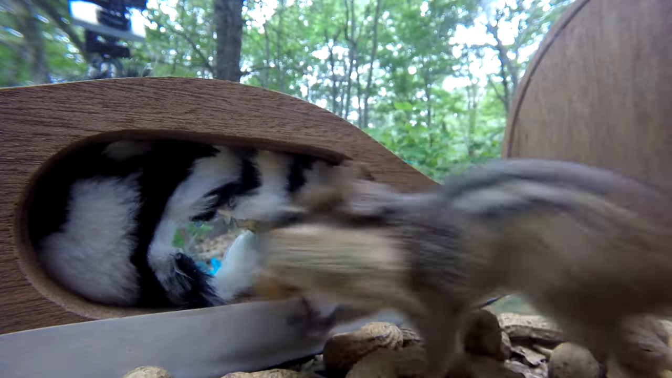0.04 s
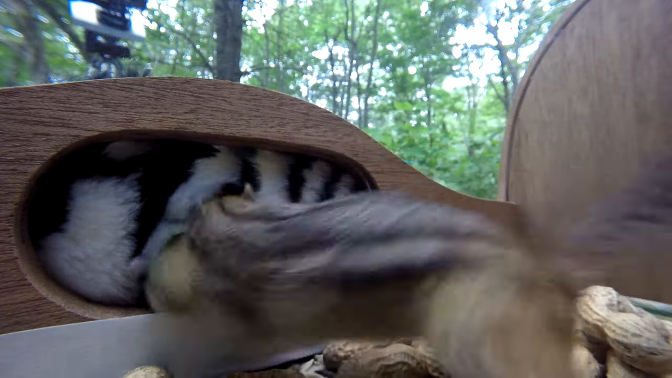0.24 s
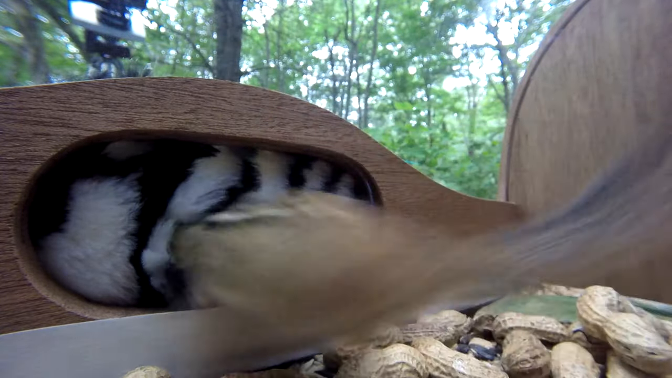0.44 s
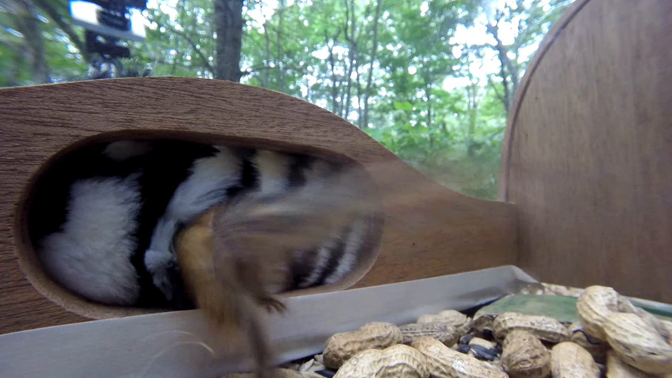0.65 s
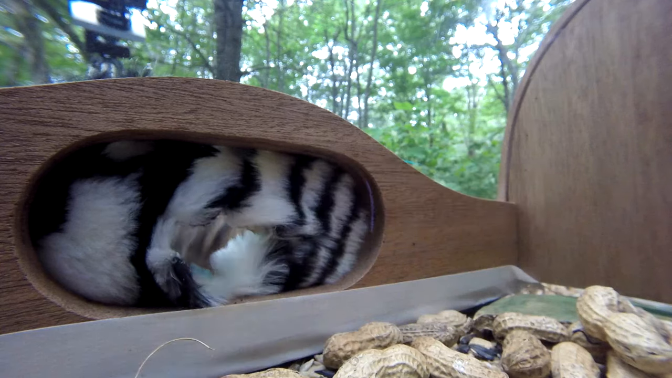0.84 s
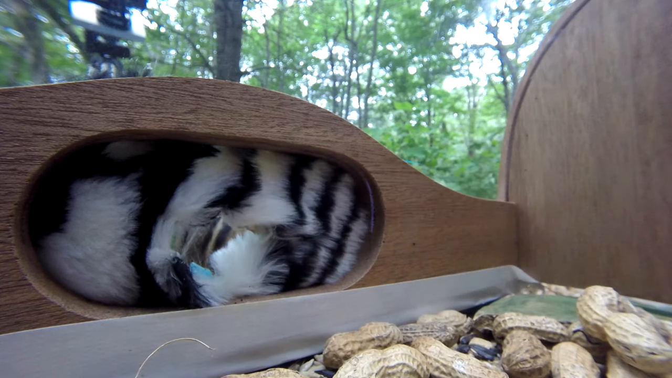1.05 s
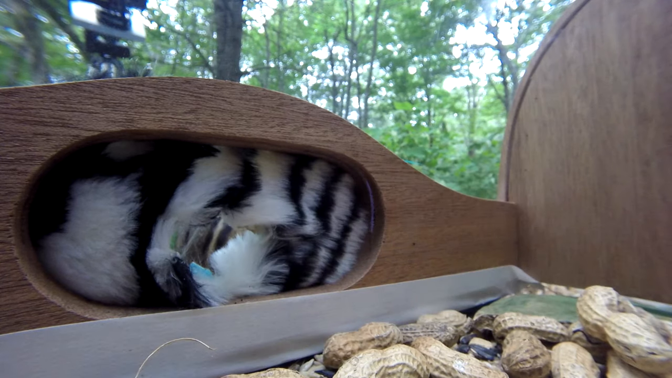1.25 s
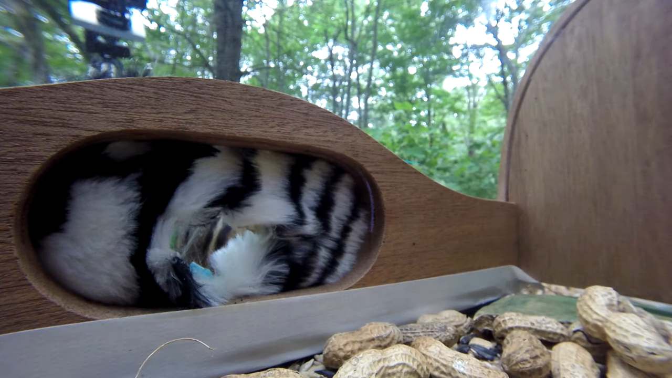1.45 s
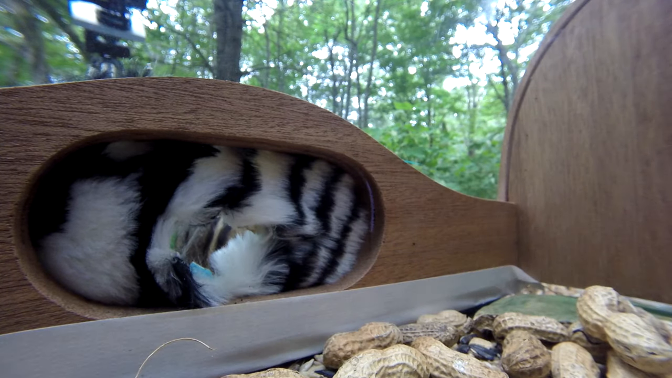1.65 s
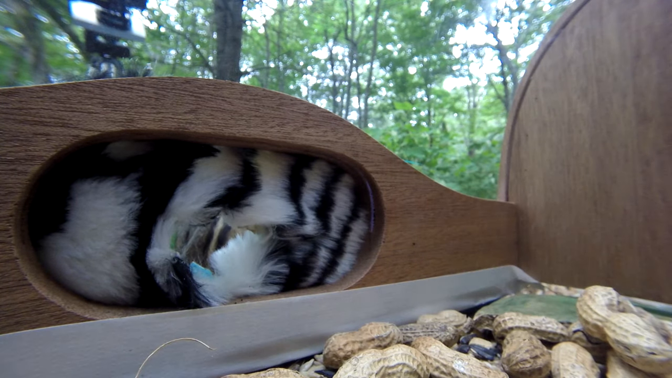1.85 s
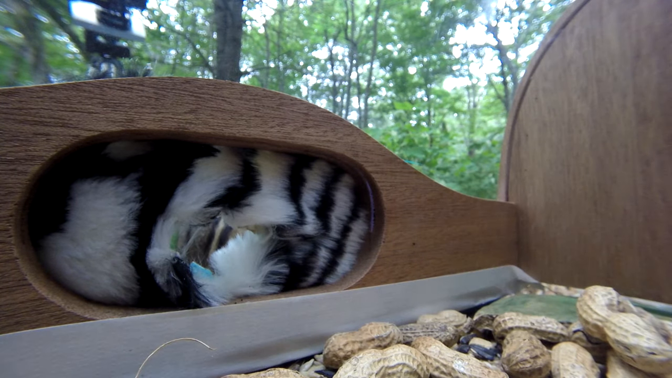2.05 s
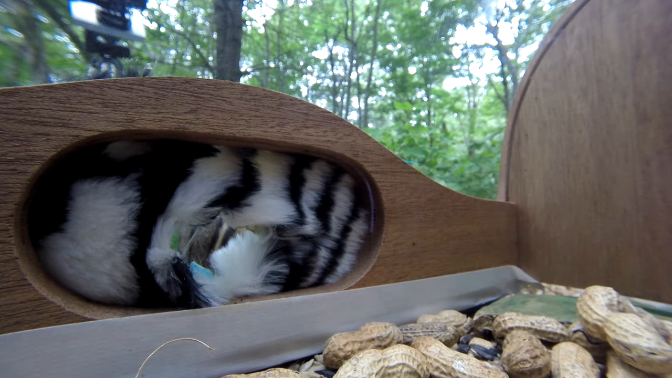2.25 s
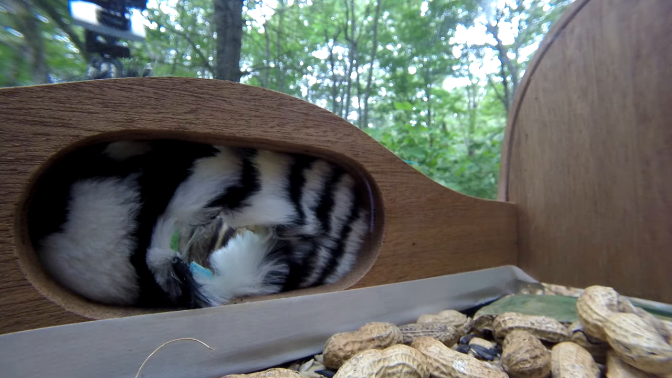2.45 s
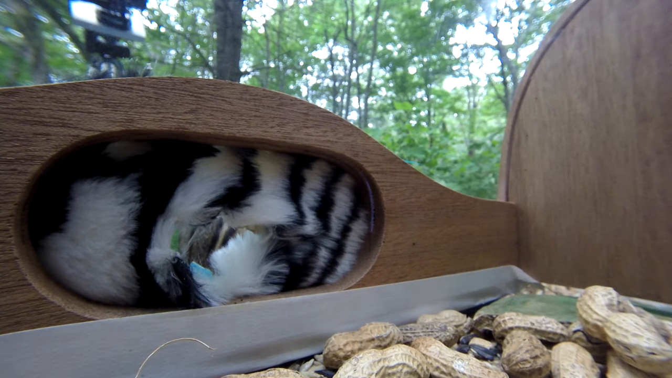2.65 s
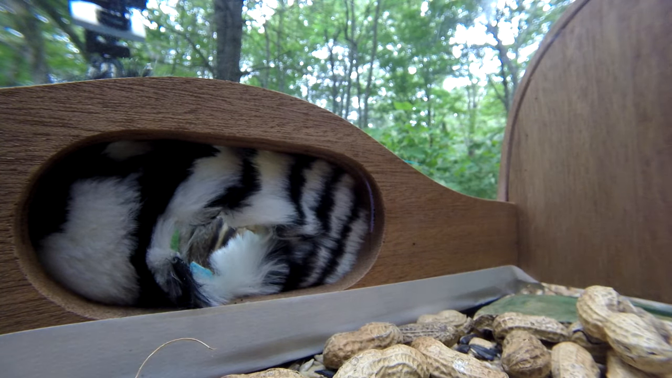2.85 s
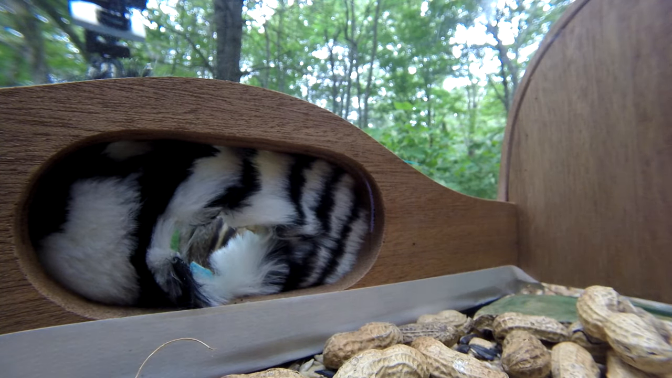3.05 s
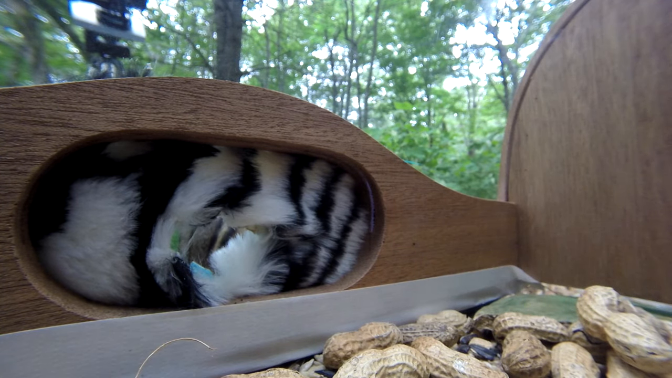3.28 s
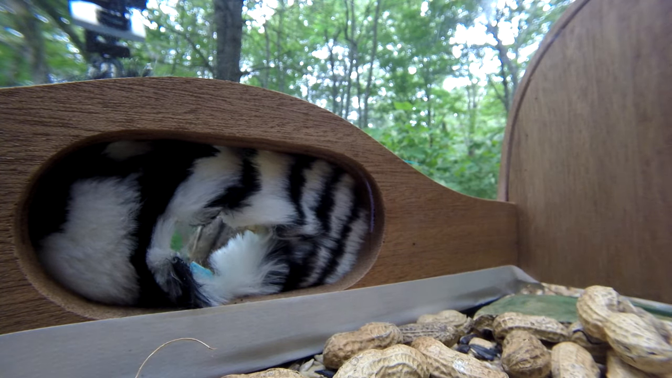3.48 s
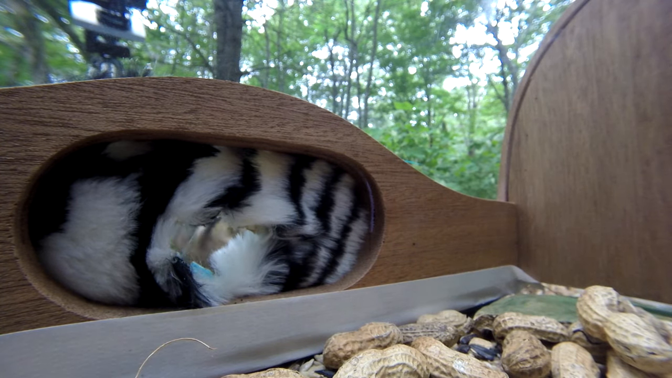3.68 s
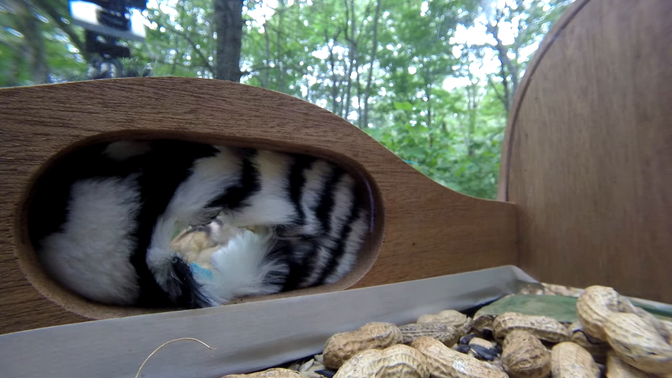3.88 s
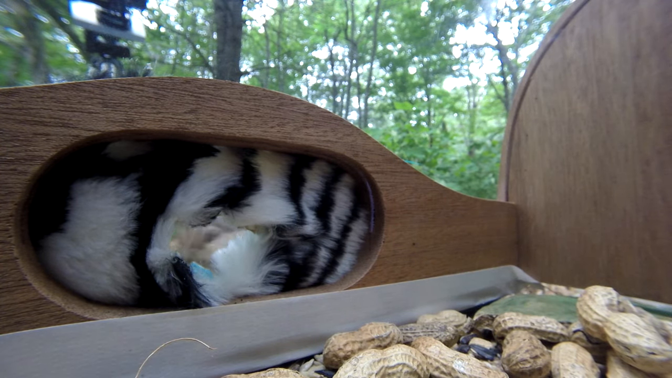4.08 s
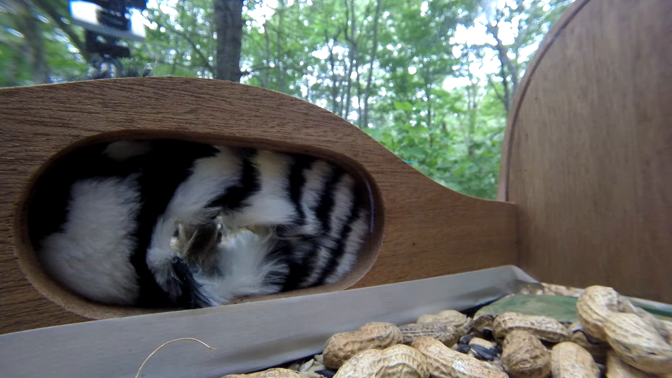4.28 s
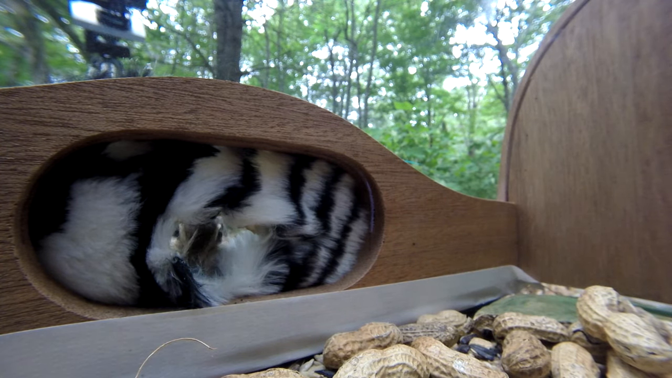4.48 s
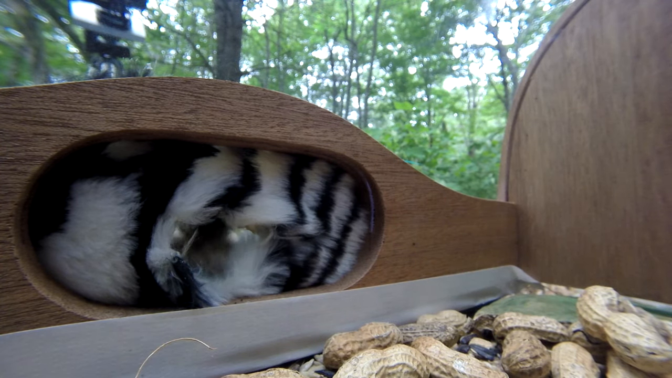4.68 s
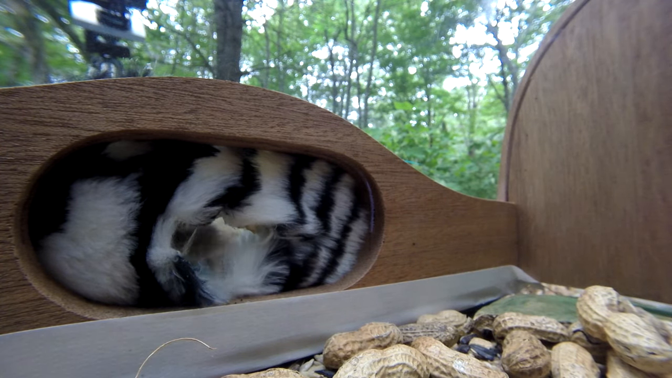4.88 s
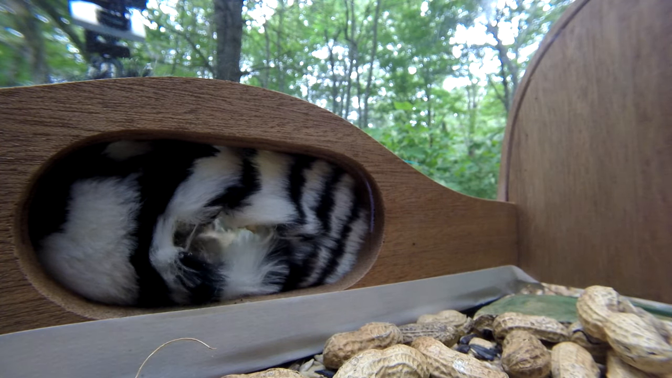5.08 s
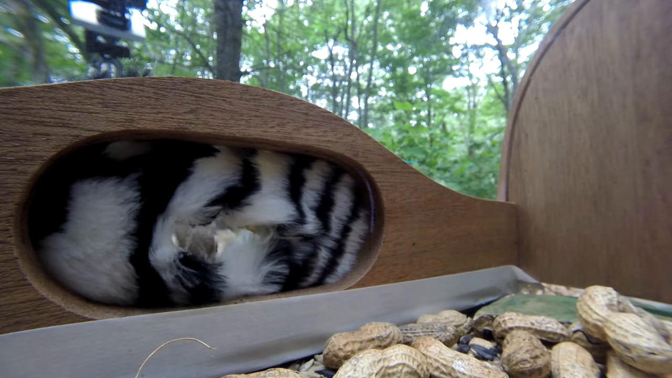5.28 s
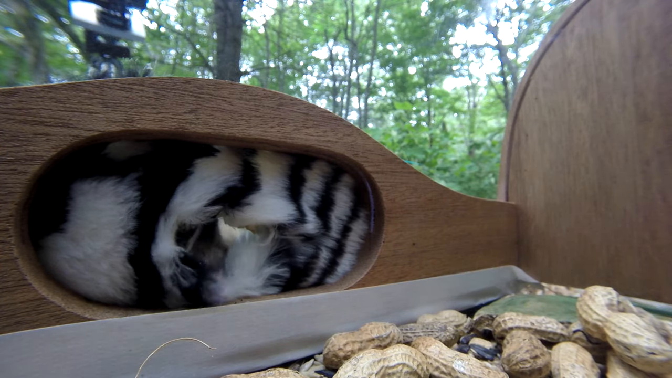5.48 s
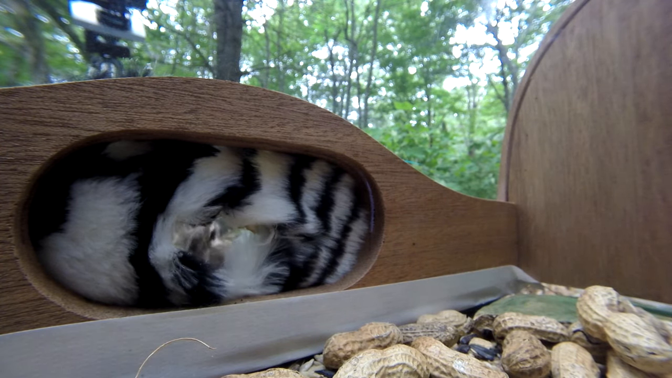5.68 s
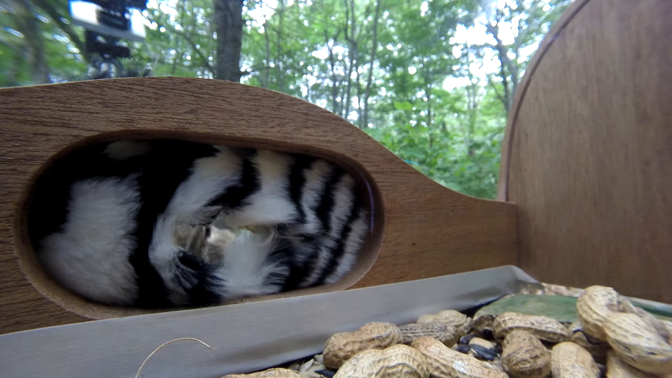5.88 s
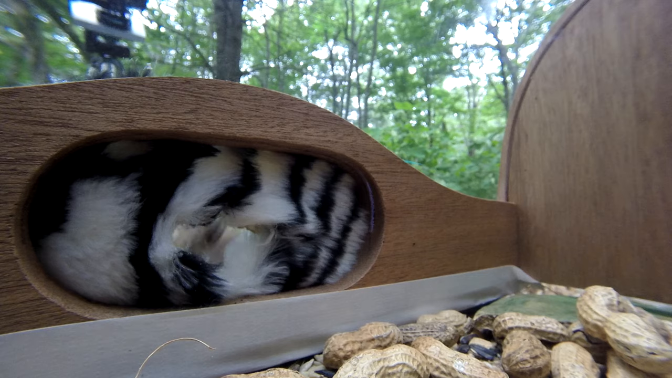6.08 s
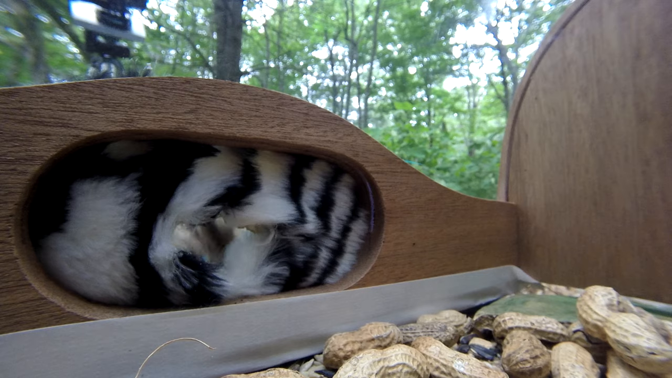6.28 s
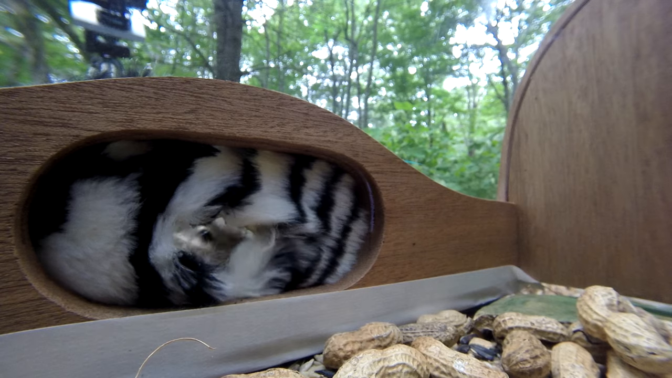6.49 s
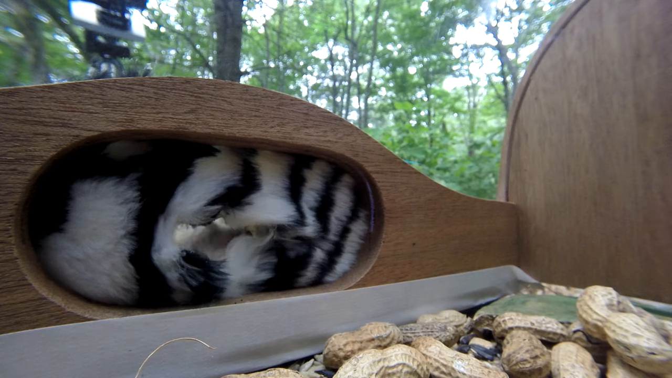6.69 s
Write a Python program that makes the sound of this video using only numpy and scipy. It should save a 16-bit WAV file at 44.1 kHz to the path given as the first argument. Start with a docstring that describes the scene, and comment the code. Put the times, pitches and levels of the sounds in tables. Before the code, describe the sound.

A quiet wood gives a faint, steady bed of leaves and soft hiss throughout, heard in mono from close beside a wooden feeder box. At 0.1 to 0.9 s a chipmunk scrambles over peanuts: hollow shells clack and rattle, sharpest near 0.4, claws scrape dryly, paws thud, with a deep bump at 0.85. A small tick follows near 1.15, then near stillness with barely audible ticks around 1.6, 1.8 and 2.4. Thin distant birds whistle at 3.1 and 3.4, quickly sliding upward, and once higher and level at 4.35. Digging starts at 3.7 with soft low thumps, again at 4.1, then at 4.7 to 5.0 with shell knocks and rustling fur and husks. From 5.1 to the end it is busiest: scratches at 5.3, strong woody knocks at 5.55, 5.9 and 6.0, boomy thumps at 6.1 and 6.6, still rummaging as it ends.

```python
"""A wooden feeder box heard from close by, in a quiet wood with faint leaves and hiss throughout.
First a chipmunk scrambles over peanuts: paws thump the boards, shells knock and rattle, claws scrape.
From about 1.2 s it has left, and only a few faint ticks remain; soon after 3 s far birds whistle.
From about 3.7 s it digs from inside a furry sleeve, with fur and husks rustling, busiest at the end.
Pushes and tiny impacts ring modes of boards and shells; shaped noise and sines make wood and birds."""
import sys
import numpy as np
from scipy import signal
from scipy.fft import rfft, irfft
from scipy.io import wavfile

SR = 44100
rng = np.random.default_rng(int(sys.argv[2]) if len(sys.argv) > 2 else 0)


def volts(x):
    """Linear amplitude factor 10**(x/20) for a level x in dB, scalar or array-like."""
    e = np.asarray(x, float) / 20
    return 10 ** e


def generate_wav(sig):
    """Save sig (samples, or channels by samples) to the path in sys.argv[1] as 16-bit PCM at SR."""
    pcm = np.round(np.clip(np.atleast_2d(sig).T, -1, 1) * 32767).astype(np.int16)
    wavfile.write(sys.argv[1], SR, pcm)


N = 296793

# far leaves and hiss, spectrum: (f/Hz, level per Hz/dB)
WOOD_SPECTRUM = [(15, -25), (25, -1), (60, 1), (120, -1.5), (200, -5), (400, -11), (1000, -17),
                 (2000, -22.5), (4000, -29), (6300, -35), (9000, -40.5), (13000, -46.5), (15500, -49)]
# far whistles: (start t/s, length t/s, first f/Hz, f/Hz where the slide levels off, level/dB)
BIRD_WHISTLES = [(3.09, .2, 3130, 3300, -68), (3.41, .15, 2500, 2650, -66), (3.41, .33, 2540, 2830, -62),
                 (4.35, .14, 4275, 4270, -65.5)]
# one curve for each bout of shuffling: (t/s, weight on the boards level/dB, rustle of husks level/dB)
SHUFFLE_BOUTS = [
    [(0, -41, -44), (0.12, -46, -58), (0.22, -24, -25), (0.4, -31, -31.5), (0.49, -32, -46.5),
     (0.55, -30, -34.5), (0.78, -28.5, -38), (0.83, -39, -56), (0.9, -21, -44), (1.0, -89, -87)],
    [(3.68, -69, -61), (3.73, -29.5, -74), (3.82, -30, -71), (3.9, -57, -61), (3.95, -68, -61)],
    [(4.05, -50, -66), (4.16, -24, -45.5), (4.25, -61, -89)],
    [(4.67, -49, -62), (4.71, -30, -39), (4.87, -35.5, -47), (5.0, -24, -24), (5.05, -36, -56),
     (5.1, -47, -71)],
    [(5.08, -51, -50), (5.16, -35.5, -57), (5.25, -27.5, -30.5), (5.35, -34, -55), (5.44, -30, -33.5),
     (5.52, -24, -34), (5.6, -37, -35.5), (5.66, -34, -38), (5.76, -43, -59)],
    [(5.76, -47, -57), (5.84, -42.5, -42.5), (5.92, -30, -40), (5.97, -29, -56), (6.16, -27.5, -60),
     (6.26, -42.5, -78)],
    [(6.26, -64, -77), (6.3, -31, -49), (6.4, -28.5, -35), (6.49, -32, -41), (6.63, -31.5, -32),
     (6.73, -28, -33)],
]
# low modes of the boards and air of the box: (f/Hz, level/dB, t60/s)
BOX_LOW_MODES = [(39, -3.5, 0.053), (71.4, -6.5, 0.25), (98, -0.5, 0.058), (135, 1, 0.15),
                 (192.9, 3, 0.098), (241.4, 3, 0.055), (340.8, -1, 0.095), (514, -0.5, 0.091)]
# high modes of the box: (f/Hz, level/dB, t60/s)
BOX_HIGH_MODES = [(484.6, -12.5, 0.039), (577, -31.5, 0.12), (817, -9.5, 0.049), (923, -5, 0.02),
                  (1045.6, -5.5, 0.036), (1129, -6, 0.012), (1390, -4, 0.0043), (1621, -22, 0.066),
                  (1970, -14.5, 0.025), (2299, -15.5, 0.025), (2547, -19.5, 0.038), (3160, -31.5, 0.052),
                  (4560, -13.5, 0.0098)]
# dry scratch, spectrum: (f/Hz, level per Hz/dB)
SCRATCH_SPECTRUM = [(1200, -11), (2200, 5.5), (3200, -7), (4500, -4), (6500, -9), (9000, -15.5),
                    (12000, -18.5), (15500, -32)]
# hollow shells knock on wood:
# (t/s, shell peak level/dB, board ring level/dB, scratch level/dB, shell pitch f/Hz)
SHELL_KNOCKS = [(0.138, -30, -35, -34, 2020), (0.2412, -12.5, -31, -29, 1810), (0.259, -27, -36, -30, 1590),
                (0.3072, -15.5, -33, -33, 1650), (0.3556, -27, -33, -34.5, 2460),
                (0.396, 1, -27, -29.5, 1570), (0.5026, -25.5, -47, -49, 2240),
                (0.5217, -35, -28.5, -48, 1330), (0.576, -21.5, -33, -61, 1740),
                (0.6283, -23, -37, -36.5, 1940), (0.702, -28, -47, -54, 2400),
                (1.1455, -39, -48.5, -80, 1730), (2.3976, -43.5, -70, -80, 1900),
                (3.7076, -33.5, -43.5, -51.5, 2530), (4.1332, -34, -31, -47, 1730),
                (4.7276, -30, -40, -52, 1750), (4.7874, -27.5, -30, -43, 1590),
                (4.932, -18.5, -37, -48, 1330), (4.9635, -11, -25, -39.5, 1800),
                (4.9857, -16, -24, -47, 2170), (5.107, -33, -38, -49, 1330),
                (5.1438, -32, -34, -46.5, 2210), (5.1782, -34, -32, -46, 1310),
                (5.195, -17.5, -23, -41.5, 2110), (5.216, -21.5, -66, -43, 2470),
                (5.2739, -14, -48, -55, 1310), (5.2969, -18, -22.5, -56, 1600),
                (5.3571, -18, -28.5, -42.5, 1650), (5.454, -22, -20.5, -38, 2010),
                (5.5512, -7, -11.5, -26, 2260), (5.5931, -30, -23.5, -44.5, 2010),
                (5.696, -29, -31, -47.5, 1970), (5.877, -5, -19, -28.5, 1204),
                (5.9676, -13.5, -21.5, -38, 2100), (6.0094, -25, -25, -46, 1810),
                (6.0236, -4.5, -15.5, -37, 1870), (6.0896, -28.5, -42, -54, 2210),
                (6.313, -36, -34, -62, 1280), (6.3631, -25, -32, -45.5, 2240),
                (6.4437, -13, -19.5, -30.5, 1880), (6.5197, -39, -30, -44, 2160),
                (6.6044, -19, -20, -39, 2240)]
# claws tick and scrape on wood: (t/s, board ring level/dB, scratch level/dB, contact length t/s)
CLAW_SCRAPES = [(0.1222, -48, -36.5, 0.025), (0.1924, -49, -32.5, 0.045), (0.3225, -31, -31, 0.03),
                (0.761, -33, -62, 0.01), (0.8522, -30.5, -45.5, 0.019), (1.576, -53.5, -62, 0.013),
                (1.827, -57, -58, 0.0045), (3.744, -46, -57, 0.019), (3.78, -40, -47.5, 0.0086),
                (3.7918, -33.5, -63, 0.012), (3.896, -53, -65, 0.0098), (4.2116, -45, -53.5, 0.0095),
                (4.8115, -30, -47.5, 0.0087), (4.904, -36, -45.5, 0.033), (5.254, -25.5, -39, 0.018),
                (5.3214, -27.5, -24.5, 0.024), (5.373, -27, -20, 0.023), (5.4175, -28, -55, 0.025),
                (5.481, -42, -39.5, 0.02), (5.499, -24, -41, 0.013), (5.865, -38, -70, 0.044),
                (5.9125, -40, -51, 0.01), (6.1053, -15, -39.5, 0.012), (6.1173, -24.5, -43, 0.015),
                (6.2076, -34.5, -51.5, 0.016), (6.287, -37, -53.5, 0.012), (6.418, -30.5, -43, 0.039),
                (6.5828, -17.5, -34, 0.012), (6.6776, -17.5, -41.5, 0.0086), (6.7204, -23.5, -38, 0.016)]
# paws on the boards: (t/s, peak level/dB, pitch that the push favours f/Hz)
PAW_THUMPS = [(0.203, -19, 177), (0.251, -17, 153), (0.319, -10.5, 180), (0.345, -17.5, 121),
              (0.513, -26.5, 101), (0.59, -22.5, 177), (0.675, -22, 64), (0.853, -3, 84), (3.716, -27, 148),
              (3.754, -19, 58.7), (3.788, -21, 86), (4.092, -20.5, 152), (4.129, -12, 90),
              (4.711, -22.2, 184), (4.782, -10, 142), (4.815, -11, 117), (4.929, -15, 181),
              (4.973, -21, 152), (5.188, -13.5, 211), (5.426, -20, 145), (5.452, -12, 190),
              (5.495, -11, 192), (5.547, 1.5, 152), (5.592, -14.5, 135), (5.69, -10, 229),
              (5.872, -6.5, 176), (6.006, -12, 58.5), (6.018, -1.5, 142.5), (6.106, -0.5, 166),
              (6.357, -17, 88.8), (6.435, -16, 200), (6.577, -1, 187), (6.675, -4.5, 193)]

WOOD_DB = -46.5
FUR_DB, FUR_FOLLOWS = -50, 0.46  # level at a rustle of -40 dB; share of the rustle's swing in dB
LEAVES_NUTS_S = 1.2
HUSKS_AMONG_NUTS_DB = -6  # lying on the heap, husks touch the boards less
RATTLE_PER_S, RATTLE_HZ, RATTLE_T60_S = 1100, (453, 3200), 0.01
RATTLE_DB = (-2, -10)  # relative to the rustle: among the nuts, from the sleeve
# contact time of a knock; it grows (dB per dB) as the shell softens and as scratch gains on shell
KNOCK_S, LONGER_IF_SOFT, LONGER_IF_SCRATCHY, LONGEST_KNOCK_S = 0.011, 0.14, 0.22, 0.02
FADE_SHAPE = {"knock": 0.93, "scrape": 1.93}  # exponent: a scrape holds, then stops
BUILD_SHARE = {"knock": 0.25, "scrape": 0.33}  # friction builds over this share of the contact
SHELL_OVERTONE, SHELL_OVERTONE_DB = 1.678, -8.5  # second mode of a shell: ratio, level


def rms_one(x):
    """Scales a sound to rms 1."""
    return x / np.sqrt(np.mean(x ** 2) + 1e-20)


def in_time(rows, quiet):
    """Draws each column as a curve over time, quiet outside its rows."""
    s, *columns = np.transpose(rows)
    t = np.arange(N) / SR
    return [np.interp(t, s, column, left=quiet, right=quiet) for column in columns]


def drift(rate):
    """Slow chance with spread 1: noise smoothed by two equal poles at rate, in Hz."""
    r = np.exp(-2 * np.pi * rate / SR)
    noise = rng.standard_normal(N + SR)
    return rms_one(signal.lfilter([1], [1, -2 * r, r * r], noise)[SR:])  # the first second settles


def ring(force, hz, t60):
    """One decaying mode set going by a force."""
    r, w = volts(-60 / (t60 * SR)), 2 * np.pi * hz / SR
    return signal.lfilter([0, np.sin(w)], [1, -2 * r * np.cos(w), r * r], force + 1e-18)


def body(force, modes):
    """Sums the modes of a body, with alternating sign."""
    return sum((-1) ** k * volts(db) * ring(force, hz, t60) for k, (hz, db, t60) in enumerate(modes))


def colour(x, spectrum):
    """Shapes a flat sound to a (f/Hz, level/dB) spectrum."""
    hz, db = np.transpose(spectrum)
    bins = np.maximum(np.fft.rfftfreq(len(x), 1 / SR), 1)
    gain = volts(np.interp(np.log(bins), np.log(hz), db))
    return irfft(rfft(x) * gain, len(x))


def grains(shape, per_s, spread_db):
    """Random tiny impacts of uneven size and either sign."""
    sizes = volts(spread_db * np.minimum(rng.exponential(1, shape), 4))
    signs = rng.choice([-1, 1], shape)
    return sizes * signs * (rng.random(shape) < per_s / SR)


def add(out, sound, s):
    """Lays a sound into the mix at s seconds."""
    at = round(s * SR)
    out[at:at + len(sound)] += sound[:N - at]


def wood():
    """Far leaves and hiss: smooth shaped noise, swelling a little."""
    hiss = rms_one(colour(rng.standard_normal(N), WOOD_SPECTRUM))
    return volts(WOOD_DB + 0.61 * drift(21)) * hiss


def birds():
    """Far near-sines that slide fast, level off and turn back a little, blurred by distance and leaves."""
    out, t = np.zeros(N), np.arange(N) / SR
    for s, length, from_hz, to_hz, level_db in BIRD_WHISTLES:
        done = np.clip((t - s) / length, 0, 1)
        slide = np.sin(0.72 * np.pi * done ** 0.85)
        hz = from_hz + (to_hz - from_hz) * slide + 42 * drift(70)
        swell = np.minimum(8 * done, 1) * (1 - done) ** 0.4
        tone = np.sin(2 * np.pi * np.cumsum(hz) / SR)
        out += volts(level_db + 2 * drift(40)) * swell * tone
    return out


def rattle():
    """Each tick rings one of 16 loose shells, every shell with a pitch of its own; rms 1."""
    ticks = grains(N, per_s=RATTLE_PER_S, spread_db=2.5) * volts(4.3 * drift(27))
    pitches = np.geomspace(*RATTLE_HZ, num=16)
    dealt = rng.integers(0, 16, size=N)
    shells = 0
    for k, hz in enumerate(pitches):
        shells = shells + ring(ticks * (dealt == k), hz, RATTLE_T60_S) * (1000 / hz) ** 0.43
    return rms_one(shells)


def rock():
    """Shifting weight gives soft small pushes that set the low modes of the box going; rms 1."""
    soft = signal.butter(2, 260, fs=SR, output="sos")
    pushes = signal.sosfilt(soft, grains(N, per_s=430, spread_db=3.5))
    return rms_one(body(pushes, BOX_LOW_MODES))


def husks(slips):
    """Sliding husks tick in uneven slips and ring the high modes of the box; rms 1."""
    springy = signal.butter(2, 3500, fs=SR, output="sos")
    ticks = signal.sosfilt(springy, grains(N, per_s=1200, spread_db=3.5) * slips)
    return rms_one(body(ticks, BOX_HIGH_MODES))


def fur(slips):
    """Fur brushes in fine grains of many sizes; each band of them comes and goes by itself; rms 1."""
    brush = colour(grains(N, per_s=4900, spread_db=-2.5) * slips, SCRATCH_SPECTRUM)
    edges = np.geomspace(1000, 16000, num=7)
    out = np.zeros(N)
    for band in zip(edges, edges[1:]):
        band_pass = signal.butter(2, band, "band", fs=SR, output="sos")
        out += volts(1.8 * drift(47)) * signal.sosfilt(band_pass, brush)
    return rms_one(out)


def shuffle():
    """Weight rocks the boards, husks and fur share the same slips, loose shells rattle along."""
    bouts = np.array([in_time(bout, quiet=-120) for bout in SHUFFLE_BOUTS])
    weight_db, rustle_db = bouts.max(axis=0)
    among_nuts = np.arange(N) / SR < LEAVES_NUTS_S
    husks_db = rustle_db + HUSKS_AMONG_NUTS_DB * among_nuts
    rattle_db = rustle_db + np.where(among_nuts, *RATTLE_DB)
    fur_db = FUR_DB + FUR_FOLLOWS * (rustle_db + 40)
    slips = volts(2.5 * drift(45))
    out = volts(weight_db) * rock() + volts(husks_db) * husks(slips)
    return out + volts(rattle_db) * rattle() + volts(fur_db) * fur(slips)


def contact_rows():
    """Lists knocks and scrapes alike; a soft or scratchy knock lasts longer, a scrape has no shell."""
    rows = []
    for s, shell_db, board_db, scratch_db, hz in SHELL_KNOCKS:
        longer_db = LONGER_IF_SCRATCHY * (scratch_db - shell_db) - LONGER_IF_SOFT * shell_db
        length = min(KNOCK_S * volts(longer_db), LONGEST_KNOCK_S)
        rows.append((s, shell_db, board_db, scratch_db, hz, length))
    for s, board_db, scratch_db, length in CLAW_SCRAPES:
        rows.append((s, None, board_db, scratch_db, None, length))
    return rows


def contacts():
    """A first knock and a spray of tiny impacts ring boards and any hollow shell; the edge scratches dry."""
    rows = contact_rows()
    size = SR // 8
    t = np.arange(size) / SR
    sprays = grains((len(rows), size), per_s=7500, spread_db=4.5)
    knock = np.exp(-((t - 0.0008) / 0.00019) ** 2)  # the first blow, short and smooth
    # every spot struck sounds a little different
    spots = rng.normal(0, 1, (len(rows), len(BOX_HIGH_MODES) + len(SCRATCH_SPECTRUM)))
    # shells give a little, so modes get less treble
    springy = signal.butter(2, 3000, fs=SR, output="sos")
    over_20_ms = np.sqrt(0.02 * SR / size)  # board and scratch levels are rms as if over 20 ms
    out = np.zeros(N)
    for (s, shell_db, board_db, scratch_db, hz, length), spray, spot in zip(rows, sprays, spots):
        kind = "knock" if hz else "scrape"
        fade = np.exp(-(t / length) ** FADE_SHAPE[kind])
        force = spray * fade * np.minimum(t / (0.17 * length), 1)
        soft = signal.sosfilt(springy, force + knock)
        dragged = force * np.minimum(t / (BUILD_SHARE[kind] * length), 1)

        modes = [(f, db + 2.5 * d, t60) for (f, db, t60), d in zip(BOX_HIGH_MODES, spot)]
        boards = rms_one(body(soft, modes))

        heavy = 0.21 * max(scratch_db + 36.5, 0)  # a heavy scratch tilts down, dB an octave
        edge = [(f, db + 2.5 * d - heavy * np.log2(f / 4000))
                for (f, db), d in zip(SCRATCH_SPECTRUM, spot[::-1])]
        scratch = rms_one(colour(dragged, edge))
        add(out, over_20_ms * (volts(board_db) * boards + volts(scratch_db) * scratch), s)

        if hz:
            overtone = ring(soft, SHELL_OVERTONE * hz, 0.0029)
            shell = ring(soft, hz, 0.013) - volts(SHELL_OVERTONE_DB) * overtone
            add(out, volts(shell_db) * shell / np.abs(shell).max(), s)
    return out


def thumps():
    """A paw's short soft push sets the low modes going; a shorter push favours the higher ones."""
    out, t = np.zeros(N), np.arange(SR // 3) / SR
    for s, peak_db, hz in PAW_THUMPS:
        phase = np.minimum(t * hz / 1.476, 1)  # 0 to 1 through the push
        window = np.sin(np.pi * phase ** 0.5) ** 2
        push = -np.sin(2 * np.pi * 1.553 * phase) * window
        sound = body(push, BOX_LOW_MODES) + volts(30) * push
        add(out, volts(peak_db) * sound / np.abs(sound).max(), s - 0.001)
    return out


def scene():
    """The quiet wood and far birds behind, the box and its visitor in front; one channel."""
    return (wood() + birds() + shuffle() + contacts() + thumps())[None]


def roll_off(x):
    """The treble ends steeply here."""
    return signal.sosfilt(signal.butter(12, 15630, fs=SR, output="sos"), x)


def record(dry):
    """The one microphone channel: the loudest peaks are rounded, the top is cut."""
    rounded = 1.2 * np.tanh(dry / 1.838)
    top_cut = signal.cheby2(12, 60, 15900, fs=SR, output="sos")
    mix = signal.sosfilt(top_cut, rounded)
    return roll_off(mix)


dry = scene()
out = record(dry)
generate_wav(out)
```